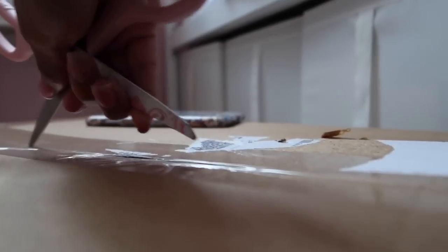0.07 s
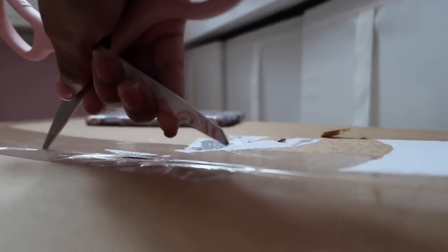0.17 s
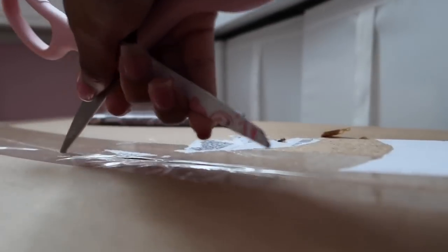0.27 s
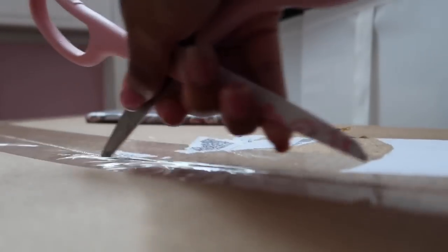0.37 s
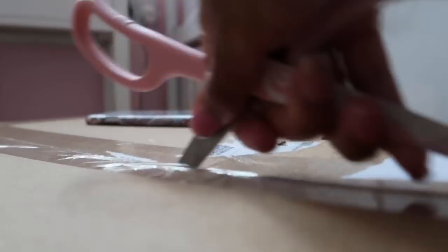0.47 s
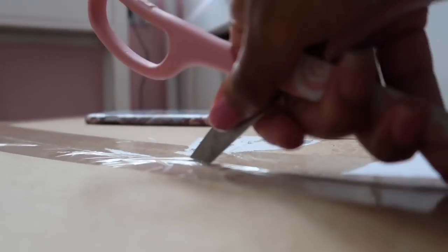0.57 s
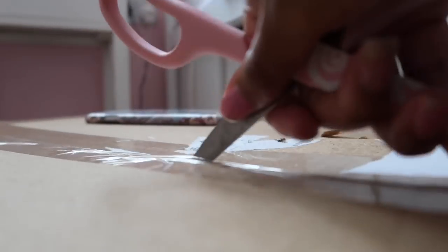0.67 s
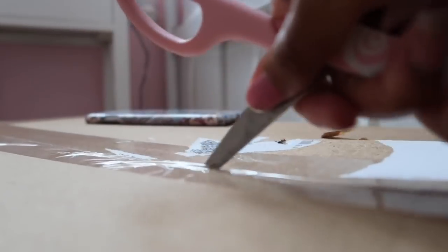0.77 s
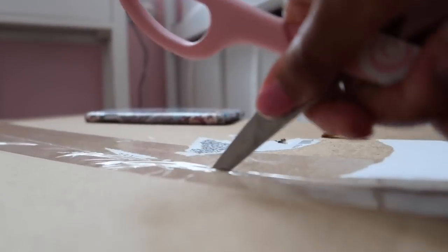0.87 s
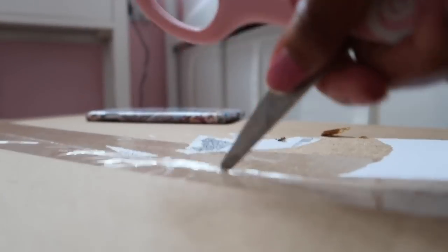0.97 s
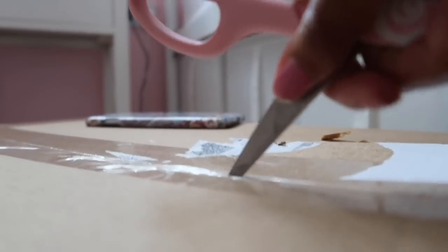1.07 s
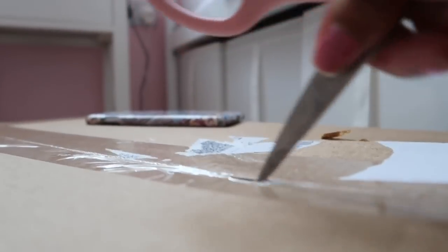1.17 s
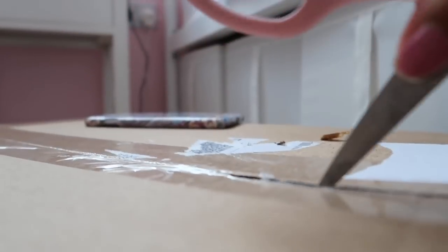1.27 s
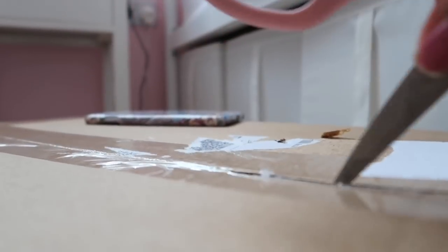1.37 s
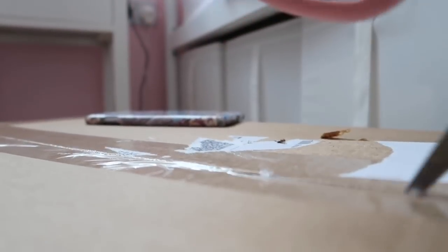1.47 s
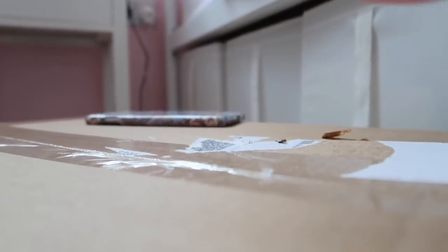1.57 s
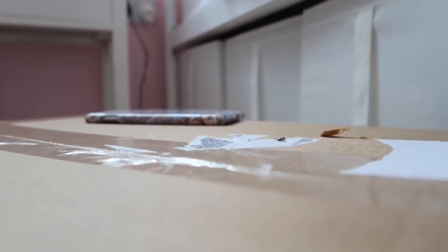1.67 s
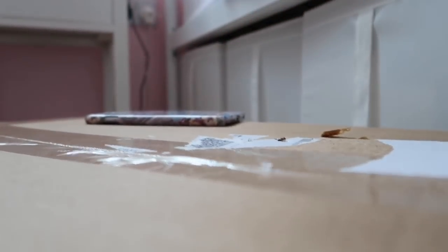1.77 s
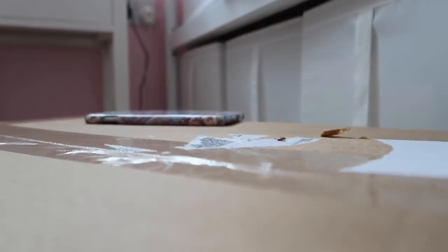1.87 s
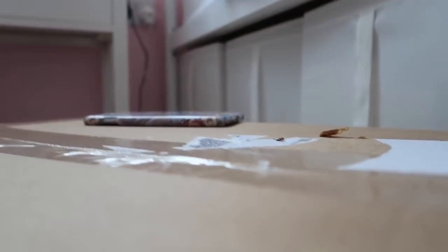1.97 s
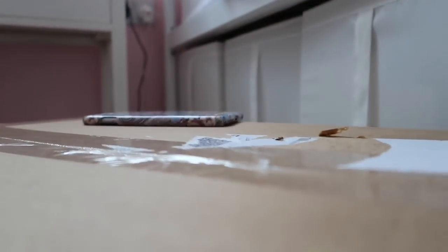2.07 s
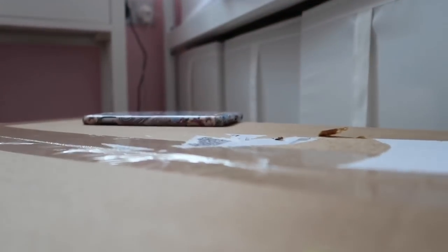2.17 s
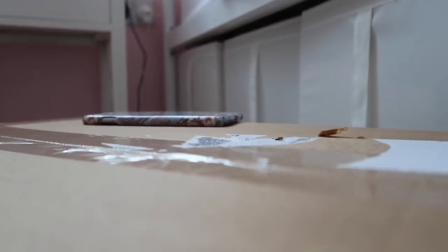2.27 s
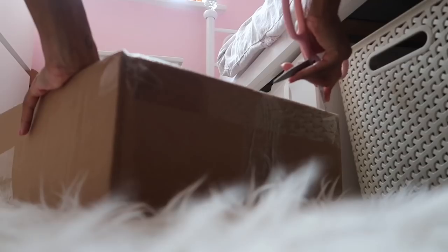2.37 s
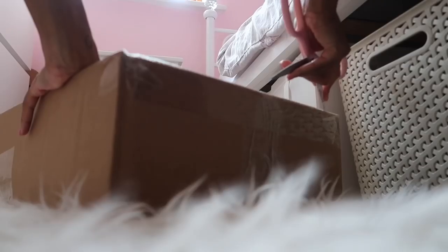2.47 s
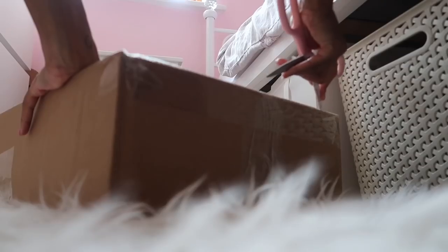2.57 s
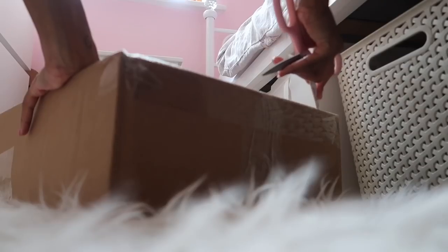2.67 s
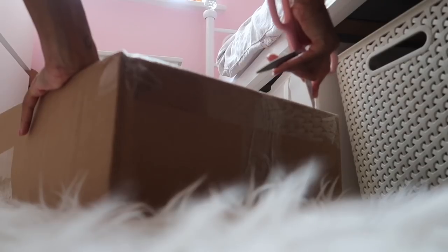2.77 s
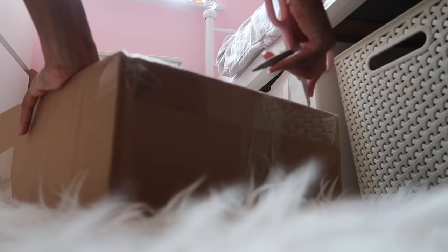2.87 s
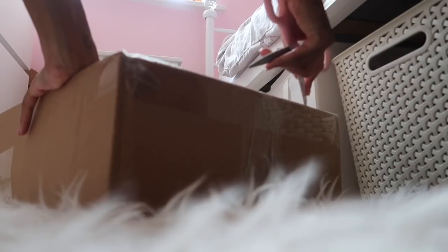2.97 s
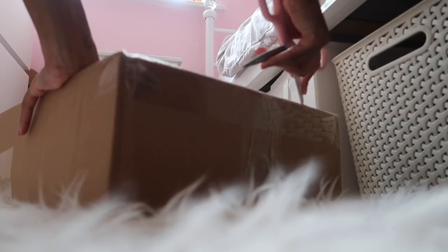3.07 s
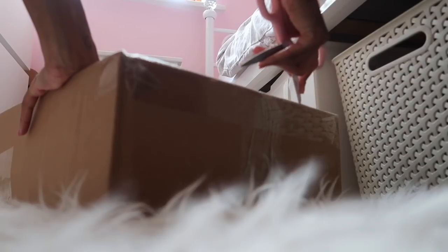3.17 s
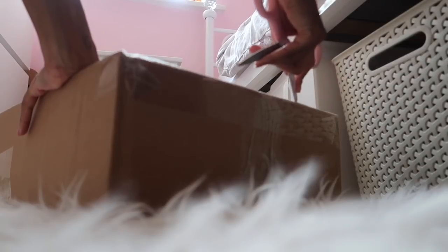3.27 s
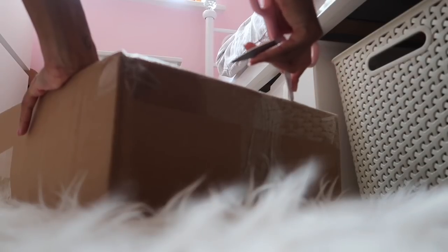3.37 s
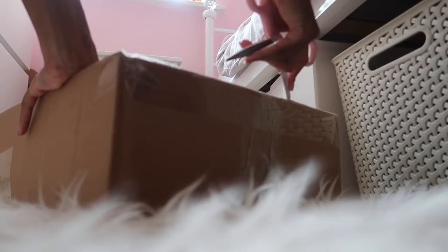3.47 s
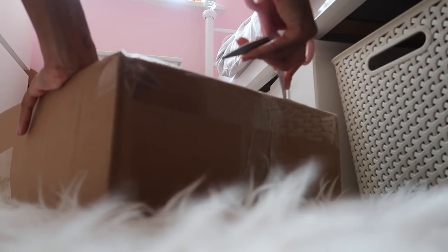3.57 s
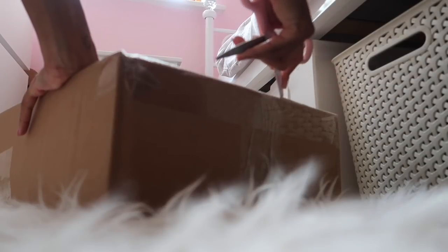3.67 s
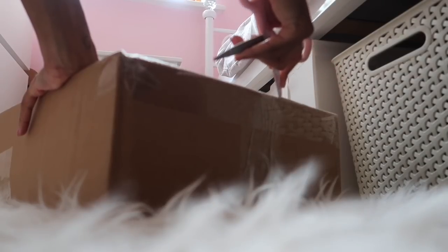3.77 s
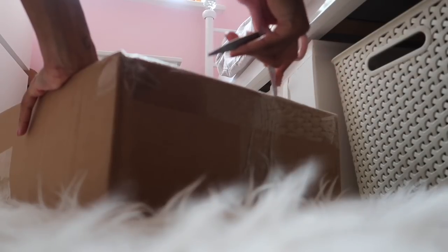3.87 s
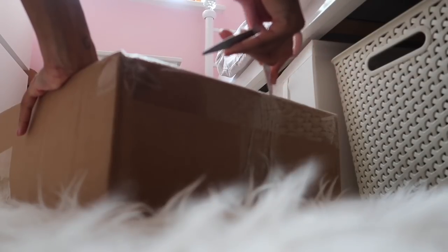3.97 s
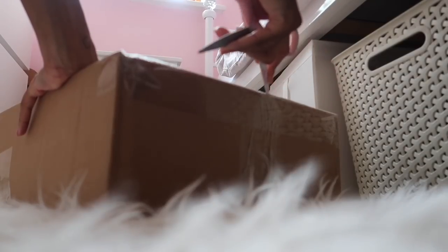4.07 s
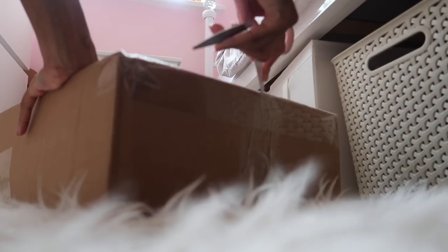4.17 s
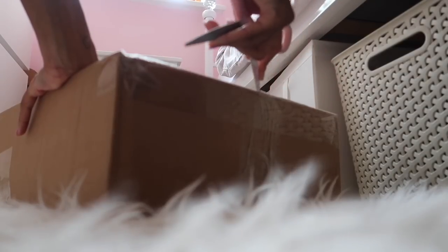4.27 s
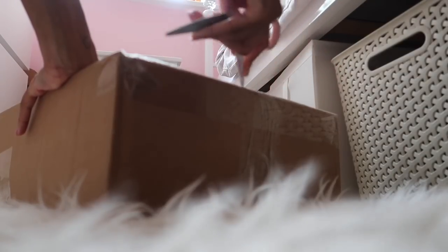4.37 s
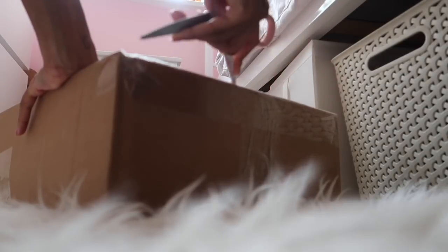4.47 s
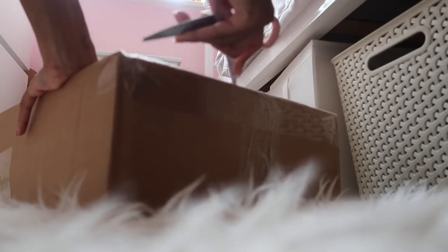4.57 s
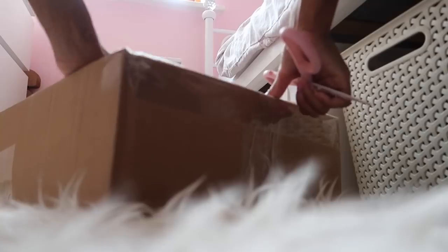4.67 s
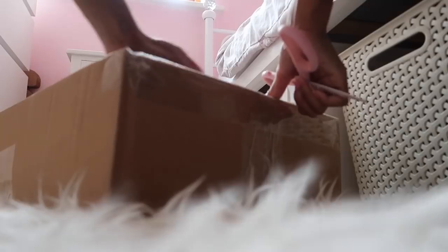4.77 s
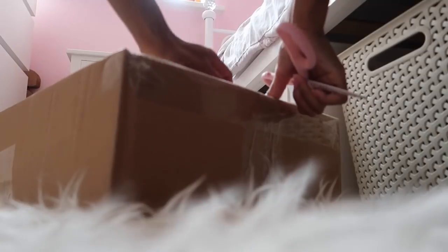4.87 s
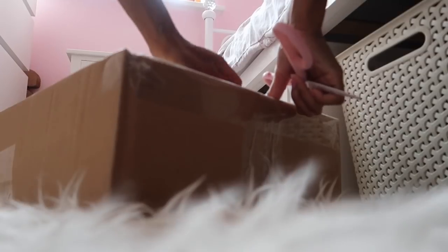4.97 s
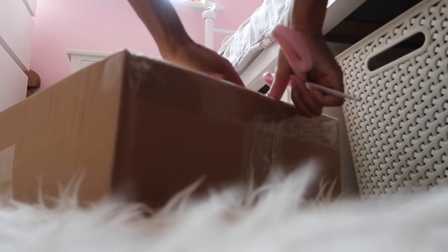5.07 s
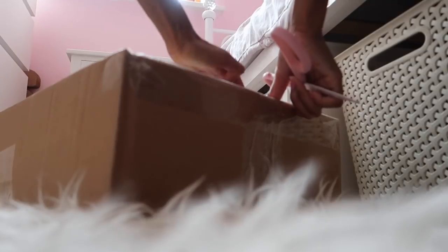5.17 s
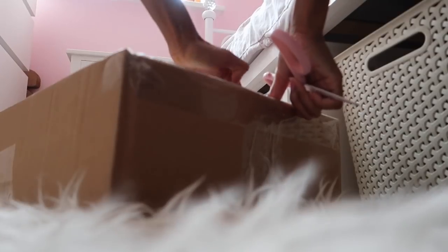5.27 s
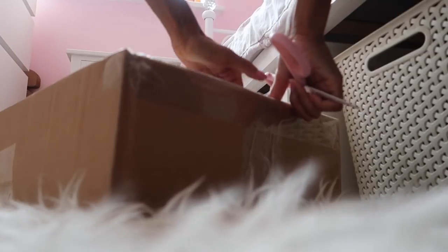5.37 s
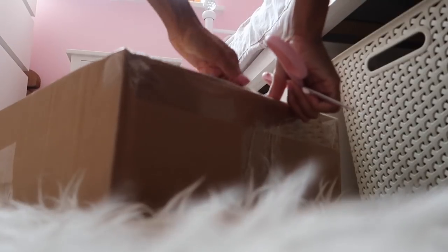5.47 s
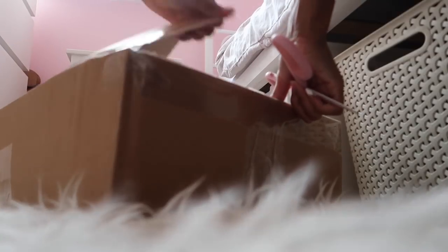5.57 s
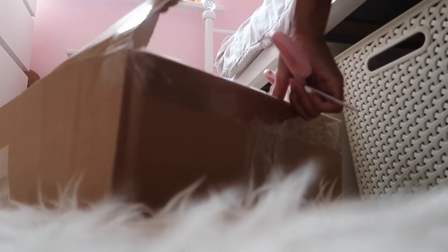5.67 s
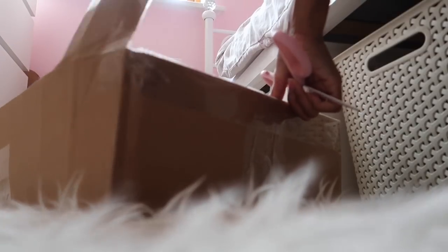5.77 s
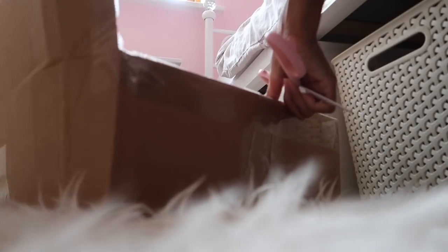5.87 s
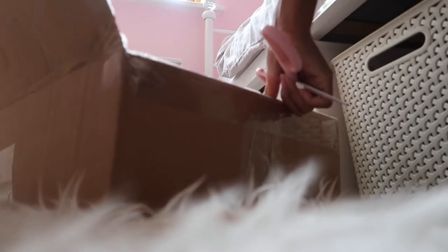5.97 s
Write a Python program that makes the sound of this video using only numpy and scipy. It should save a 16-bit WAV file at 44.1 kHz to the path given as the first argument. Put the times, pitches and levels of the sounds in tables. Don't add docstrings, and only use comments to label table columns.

```python
import sys
import numpy as np
from scipy import signal
from scipy.fft import rfft, irfft, next_fast_len
from scipy.io import wavfile
from scipy.ndimage import uniform_filter1d, map_coordinates

SR = 44100
rng = np.random.default_rng(int(sys.argv[2]) if len(sys.argv) > 2 else 0)


def to_linear_factor(level_db):
    exponent = np.asarray(level_db, float) / 20
    return 10 ** exponent


def pcm_store(signal):
    levels = np.round(np.clip(np.atleast_2d(signal), -1, 1) * 32767)
    wavfile.write(sys.argv[1], SR, levels.astype(np.int16).T)


N = 265085
TIME_S = np.arange(N) / SR
FAR_S = 2.385
HANDS_S = 4.87


def unit(x):
    return x / np.sqrt(np.mean(x ** 2) + 1e-20)


def along(points, f_hz):
    f, v = np.transpose(points)
    return np.interp(np.log(f_hz + 1), np.log(f + 1), v)


def wobble(rate_hz):
    knots = rng.standard_normal(int(N * rate_hz / SR) + 4)
    return map_coordinates(knots, [np.arange(N) * rate_hz / SR])


def filtered(x, response):
    m = next_fast_len(N + SR // 2)
    h = response(np.fft.rfftfreq(m, 1 / SR))
    h = h / np.sqrt(np.mean(np.abs(h) ** 2))
    return irfft(rfft(x, m) * h, m)[..., :N]


def modes(table, top_hz):
    def response(f):
        ring = 0
        for k, (mode_hz, width_hz, db) in enumerate(table):
            damping = 1j * f * width_hz
            ring = ring + (-1) ** k * to_linear_factor(db) * damping / (mode_hz ** 2 - f ** 2 + damping)
        return ring / (1 + 1j * f / top_hz) ** 2
    return response


def colour(points):
    return lambda f: to_linear_factor(along(points, f))


def placed(x, near, far):
    first = TIME_S < FAR_S
    return filtered(x * first, near) + filtered(x * ~first, far)


# f/Hz, density/(dB per Hz)
QUIET = [(25, -12), (52, -3), (90, -25), (205, -2.5), (440, -4.5), (690, -18), (1520, -19.5), (5100, -26),
         (11200, -39.5), (15500, -81)]
# f/Hz, level/dB
CLOSE_HUSH = [(1500, 8.5), (4000, 1.5), (9000, -13)]


def quiet():
    near = lambda f: colour(QUIET)(f) * colour(CLOSE_HUSH)(f)
    noise = placed(rng.standard_normal((2, N)), near, colour(QUIET))
    return to_linear_factor(-53.5 + 0.17 * wobble(2.0)) * noise


def echo(x, decays, lag):
    f_hz, t, z = signal.stft(rng.standard_normal(SR // 2), SR, nperseg=128)
    t60_s = along(decays, f_hz)[:, None]
    tail = signal.istft(z * to_linear_factor(-60 * t / t60_s), SR, nperseg=128)[1]
    return signal.fftconvolve(np.pad(x, (lag, 0)), tail / np.linalg.norm(tail))[:N]


# f/Hz, t60/s
BEDROOM = [(150, 0.15), (1500, 0.053), (10000, 0.11)]


def room(x):
    return echo(x * to_linear_factor(np.where(TIME_S < FAR_S, -19, -11)), BEDROOM, lag=250)


# t/s, peak level/dB
TICKS = [(.165, -23), (0.5254, -32), (1.296, -23.5), (1.455, -42), (1.4746, -32), (1.4975, -29),
         (1.6302, -26.5), (1.673, -44), (1.7553, -24), (1.7816, -24.5), (1.801, -19.5), (1.853, -22.5),
         (1.766, -26), (1.965, -38.5), (1.974, -40), (2.817, -31), (3.047, -43), (4.385, -33), (4.688, -45),
         (2.459, -36.5), (2.809, -26.5), (2.8508, -26.5), (2.866, -26.5), (2.8854, -29), (2.9832, -24.5),
         (3.0108, -24), (3.0855, -28.5), (3.5658, -25.5), (5.162, -23), (5.5792, -16.5)]
# f/Hz, level/dB
FILM = [(2000, -30), (5000, -8), (8000, 0), (12000, -1), (14000, -12), (16000, -20)]


def ticks():
    x, t = np.zeros(N + SR), np.arange(400) / SR
    for (s, db), noise in zip(TICKS, rng.standard_normal((len(TICKS), len(t)))):
        x[round(s * SR):][:len(t)] += to_linear_factor(db - 11 - 60 * t / 0.0084) * noise
    return filtered(x[:N], colour(FILM))


# t/s, level/dB, low f/Hz, high f/Hz, high relative level/dB, t60/s
SNAPS = [(0.3582, -4, 517, 1770, -10, 0.033), (0.382, -4, 328, 656, 3, 0.06),
         (.573, -15, 322, 704, -17, 0.059), (.494, -16.5, 600, 2290, -28, 0.03),
         (.906, -22.5, 1380, 2520, -13, 0.023), (4.897, -25.5, 610, 3080, -21, .03),
         (5.13, -23.5, 526, 2290, -6.5, 0.03), (5.16, -20, 578, 3360, -6, 0.063),
         (5.217, -26.5, 423, 4170, -16, 0.03), (1.296, -15.5, 1019, 1760, -7.5, 0.05),
         (1.9884, -2.5, 1017, 1940, 5, 0.018), (2.168, -40, 1096, 500, 5.5, 0.049),
         (4.494, -19.5, 752, 2360, -6, 0.051), (5.5798, 0.5, 713, 1375, 8.5, 0.032),
         (5.581, -8, 1850, 3200, 3, 0.048), (5.587, -4.5, 702, 2450, -4, 0.033),
         (5.853, -13, 2390, 3870, -4.5, 0.023), (.015, -19, 715, 1300, -9, 0.03),
         (.165, -18, 700, 2600, -13, 0.023), (.198, -18, 830, 2210, -11, 0.037),
         (.289, -14, 643, 2000, -23, 0.035), (.545, -11, 544, 1480, -13, 0.044),
         (.963, -40, 420, 1100, -4, .015), (1.614, -20.5, 460, 2000, -14, 0.02),
         (1.803, -24.5, 545, 2180, -9, .025), (5.797, -19, 637, 4250, -2.5, 0.016),
         (1.989, -14, 2980, 3600, 12, 0.011), (5.854, -2.5, 712, 2350, -11.5, 0.023)]


def snaps():
    x, t = np.zeros(N + SR), np.arange(SR // 4) / SR
    drift = .05 * np.cumsum(rng.standard_normal((len(SNAPS), 2, len(t))), axis=2)
    for (s, db, low_hz, high_hz, high_db, t60_s), (low_rad, high_rad) in zip(SNAPS, drift):
        low = to_linear_factor(-60 * t / t60_s) * np.sin(2 * np.pi * low_hz * t + low_rad)
        high = to_linear_factor(high_db - 60 * t / (0.37 * t60_s)) * np.sin(2 * np.pi * high_hz * t + high_rad)
        attack = 1 - np.exp(-t / .0004)
        x[round(s * SR):][:len(t)] += to_linear_factor(db) * (low + high) * attack
    return x[:N]


# start t/s, length/s, level/dB, f/Hz, width/Hz
GLIDES = [(0.118, 0.096, -52, 5240, 500), (0.752, 0.12, -60, 5250, 500), (0.805, 0.1, -39.5, 1250, 700),
          (1.02, .07, -62, 5150, 500), (1.127, 0.039, -61, 5300, 400), (1.191, 0.11, -57, 5250, 500),
          (1.505, 0.099, -50.5, 5550, 900), (2.083, 0.067, -60.5, 5170, 500),
          (2.281, 0.089, -64.5, 2400, 500), (0.412, 0.22, -35.5, 650, 300), (4.532, 0.16, -59.5, 3800, 400),
          (0.099, 0.076, -26, 207, 50)]


def glides():
    x, t = np.zeros(N + SR), np.arange(SR // 4) / SR
    edge_s = .008
    for (s, length_s, db, f_hz, width_hz), noise in zip(GLIDES, rng.standard_normal((len(GLIDES), len(t)))):
        resonance = np.exp(-np.pi * width_hz * t) * np.sin(2 * np.pi * f_hz * t)
        ring = signal.fftconvolve(noise, resonance)[:len(t)]
        gate = np.clip(np.minimum(t, length_s - t) / edge_s, 0, 1)
        x[round(s * SR):][:len(t)] += to_linear_factor(db) * gate * unit(ring)
    return x[:N] * to_linear_factor(2.0 * wobble(60))


# t/s, level/dB, f/Hz, t60/s
THUMPS = [(.266, -19, 240, .04), (.384, -9.5, 521, 0.037), (.386, -11.5, 920, 0.03), (.02, -19, 194, 0.11),
          (.565, -9, 330, 0.046), (1.2975, -2, 150, 0.056), (1.297, -17, 685, .035),
          (2.037, -13, 115, 0.063), (1.992, -10.5, 160, 0.059), (2.722, -33, 215, .05),
          (2.89, -18.5, 210, 0.054), (3.085, -22.5, 207, 0.038), (3.016, -25.5, 217, .03),
          (4.96, -16, 202, .05), (5.4, -22.5, 220, .04), (5.042, -21, 140, .04),
          (5.165, -10.5, 130.4, 0.051), (5.219, -8, 106.6, .08), (5.383, -2, 210, 0.049),
          (5.467, -18.5, 227, .08), (5.582, -8, 810, 0.046), (5.584, -11.5, 212, 0.066),
          (5.785, -21, 230, .05), (5.8, -15, 194, 0.052), (5.853, 1, 185, 0.04), (5.99, -27, 150, 0.076),
          (2.0312, -4, 500, .012), (1.996, -14.5, 520, 0.051), (2.05, -28, 600, 0.045),
          (5.5, -15, 760, .015), (5.2175, -20.5, 810, 0.017), (5.333, -19.5, 650, 0.014),
          (0.15, -15.5, 750, 0.014), (1.6145, -27, 570, 0.014), (.574, -8.5, 350, 0.023),
          (2.889, -39, 900, .02), (2.72, -37, 1500, 0.036), (1.205, -26, 200, .08),
          (1.086, -12, 200, 0.031), (0.63, -20, 110, 0.059)]


def thumps():
    x, t = np.zeros(N + SR), np.arange(SR // 4) / SR
    rise_cycles = 0.24
    drift = .02 * np.cumsum(rng.standard_normal((len(THUMPS), len(t))), axis=1)
    for (s, db, f_hz, t60_s), drift_rad in zip(THUMPS, drift):
        attack = 1 - np.exp(-t * f_hz / rise_cycles)
        boom = np.sin(2 * np.pi * f_hz * t + drift_rad) * attack
        x[round(s * SR):][:len(t)] += to_linear_factor(db - 60 * t / t60_s) * boom
    return signal.lfilter(*signal.butter(2, 70, "high", fs=SR), x[:N])


# start t/s, length/s, first pressure/dB, last pressure/dB, edge/dB
NEAR_CUTS = [(-.02, 0.4, -37.5, -27, 4), (.41, 0.16, -42, -36.5, -1.5), (.545, 0.052, -26.5, -35.5, 1.5),
             (.6, 0.06, -57, -59, -5), (.7, 0.1, -58, -47, 2), (.82, 0.096, -44.5, -41, -1.5),
             (1.0, 0.11, -52, -38.5, -1), (1.2, 0.12, -42, -30.5, 2.5), (1.43, 0.081, -50.5, -30.5, 0),
             (1.52, 0.086, -30.5, -35, 4), (1.62, .22, -35.5, -32.5, -0.5), (2.0, 0.071, -28, -55.5, -7),
             (2.08, 0.12, -51.5, -62, -11), (2.28, 0.069, -82, -77, 5.5)]
FAR_CUTS = [(2.41, 0.2, -63.5, -56, 11), (2.75, 0.38, -55.5, -59, 5), (3.16, 0.14, -56, -48, 2),
            (3.32, 0.457, -49, -50.5, 8.5), (3.82, 0.079, -55, -70, 15), (3.93, 0.18, -44, -47.5, 1.5),
            (4.07, 0.213, -51, -50.5, 6), (4.35, 0.07, -47, -48.5, 6), (4.46, 0.051, -37.5, -38, -2.5),
            (4.52, 0.12, -59, -64.5, 16.5), (4.73, 0.12, -50, -60, 9.5)]
PULLS = [
    (4.91, 0.15, -40, -47, -8.5),
    (5.14, 0.16, -38.5, -47, 2),
    (5.3, 0.1, -47, -41, 1),
    (5.44, 0.12, -44.5, -41, 3),
    (5.6, 0.12, -33, -52.5, -2.5),
    (5.79, 0.1, -49, -36, -6),
    (5.87, 0.14, -43.5, -57.5, 14),
    (5.98, 0.035, -60, -47, 8),
]


def strokes():
    press_db_per_s, lift_db_per_s = 1088, 458
    t = np.arange(0, N / SR + .01, .002)
    rest_db = np.array([-58, -74, -74])
    power = to_linear_factor(rest_db[:, None] + 0 * t) ** 2
    laws = ((NEAR_CUTS, -39, 0.87, -56, 0.77), (FAR_CUTS, -40, 0.44, -53.5, 1.73), (PULLS, -36.5, 0.35, -59.5, 2.2))
    for table, drum_db, drum_grows, hiss_db, hiss_grows in laws:
        for s, length_s, first_db, last_db, edge_db in table:
            off_db = press_db_per_s * np.maximum(s - t, 0) + lift_db_per_s * np.maximum(t - s - length_s, 0)
            over_db = np.interp(t, [s, s + max(length_s, .01)], [first_db, last_db]) + 45
            levels_db = np.array([drum_db + drum_grows * over_db,
                                  over_db - 45,
                                  hiss_db + edge_db + hiss_grows * over_db])
            power = power + to_linear_factor(levels_db - off_db) ** 2
    return [np.interp(TIME_S, t, np.sqrt(p)) for p in power]


def slips(rate_hz, spread_db, clump_db, clump_hz):
    hit = rng.random(N) < rate_hz / SR
    size = to_linear_factor(spread_db * rng.exponential(size=N)) * rng.standard_normal(N)
    return unit(hit * size * to_linear_factor(clump_db * wobble(clump_hz)))


def drags():
    drum, rasp, hiss = strokes()
    judder = wobble(45)
    drum = drum * unit(to_linear_factor(0.5 * judder) * slips(600, spread_db=-0.5, clump_db=2.5, clump_hz=41))
    rasp = rasp * unit(to_linear_factor(1.06 * judder) * slips(2600, spread_db=1.5, clump_db=2.9, clump_hz=130))
    hiss = hiss * unit(to_linear_factor(2.3 * judder) * slips(12000, spread_db=-0.5, clump_db=0.0, clump_hz=270))
    return np.array([drum, rasp, hiss])


# t/s, strength/dB, weight/dB, edge/dB, fade/s
NEAR_CATCHES = [(0.016, -26, 5, -12, 0.0073), (0.165, -28, 8, -3, 0.01), (.289, -31.5, 0, -16, 0.027),
                (.496, -41, -5, -15, 0.006), (.546, -21, 1, -28, 0.025), (.668, -50, 9, -11, 0.0068),
                (0.965, -36, 4, -39, 0.0044), (1.092, -27.5, 5, -11, 0.006),
                (1.297, -15.5, 1, -3.5, 0.0038), (1.417, -42, 6, -20, 0.0023),
                (1.614, -23.5, -3, -20, 0.0068), (1.803, -22.5, -5.5, -13.5, 0.017),
                (1.99, -10.5, -1, -16.5, 0.0024), (2.032, -18.5, 6, -19.5, 0.0038),
                (2.072, -36.5, 2.5, -24.5, 0.0058), (0.0441, -31, 5, -21, 0.0052),
                (.085, -33.5, 0, -23, 0.0064), (0.109, -39, -1, -18, .006), (.14, -23, -4, -12, 0.0055),
                (.197, -25, -6, -6, 0.007), (.211, -21.5, -0.5, -12, 0.0053), (.241, -26, 4, -10, 0.0045),
                (0.264, -19, -2, -13, 0.0064), (.299, -23, -2, -11, 0.0066), (0.339, -29.5, 5, -12, 0.0028),
                (0.48, -45, 3, -18, .004), (0.513, -39, -3, -19, 0.004), (0.928, -48, 9, 0, 0.0026),
                (1.271, -33.5, 15, -6.5, 0.0081), (1.497, -31, -5, -11.5, 0.012),
                (1.535, -30.5, -1, -4, 0.0044), (1.575, -29.5, 4.5, -14, 0.005),
                (1.673, -28, 0, -10, 0.006), (1.697, -24, 10, -14.5, 0.0033),
                (1.721, -29.5, 1.5, -15, 0.0031), (1.744, -33, 7.5, -13.5, 0.0043),
                (1.779, -27, 0, -12.5, .005), (1.838, -32.5, 1.5, -8, 0.0057)]
FAR_CATCHES = [(2.805, -45.5, 9, -5, 0.048), (2.857, -48, 19, 4, 0.013), (3.922, -46, 11, -5.5, 0.02),
               (4.348, -40.5, 3, -23, 0.048), (4.447, -37.5, -2, -4, 0.013), (4.896, -34.5, 9, -34, 0.0057),
               (4.96, -30.5, 6.5, -17, 0.026), (5.132, -25.5, -2, -14, 0.0044),
               (5.218, -30.5, 3.5, -8.5, 0.03), (5.462, -27, -3, -16, 0.0044), (5.49, -30, 0, -16, 0.0037),
               (5.535, -33, 3.5, -12, 0.0027), (5.699, -45, -11, -12, 0.027), (5.782, -38, 7.5, -27, .005),
               (5.854, -14, -6.5, -9, 0.0086), (2.717, -43, 13.5, -9, 0.0076), (2.828, -47, 6, -7, .005),
               (2.888, -38, -1, -10, 0.0053), (2.932, -37, 1, -9, .006), (3.018, -43, 4.5, -2, 0.00346),
               (4.925, -39, -2, -16.5, 0.0029), (5.029, -37.5, 1, -26, 0.0067), (5.07, -50, 3, -2, 0.0044),
               (5.105, -44.5, 4, -8, 0.0079), (5.159, -30.5, -1, -12, 0.0061), (5.253, -40, 3, -3, .005),
               (5.371, -41, 5, -17, 0.0042), (5.446, -40, 1, -11, 0.0045)]
# peak t/s, strength/dB, weight/dB, edge/dB, fade/s
NEAR_TEARS = [(.032, -29, 3, -19, 0.12), (.143, -32.5, 10, -21, 0.069), (.27, -23.5, 12.5, -9.5, 0.0095),
              (0.33, -21.5, -0.5, -13, 0.022), (0.3605, -16, -4, -15, 0.0049),
              (0.386, -10, -8, -12, 0.0053), (.563, -16, 0, -17.5, 0.0093), (0.574, -20, 1, -26, 0.0075),
              (.908, -27, -29, -12.5, 0.003), (1.205, -30.5, -5, -14, 0.035), (1.353, -32, 2, -12.5, 0.017),
              (1.558, -30, 8, -10, 0.021), (1.649, -28.5, 8, -11.5, 0.012),
              (1.724, -30.5, 6.5, -26.5, 0.019), (1.781, -37, 11.5, -1.5, 0.011),
              (2.045, -35.5, 15, -25.5, 0.021), (2.089, -34, 7, -31, 0.0033),
              (2.172, -56.5, 16, -27, 0.049)]
FAR_TEARS = [(2.595, -53.5, 13, -15, 0.0083), (2.649, -51, 14.5, -6, 0.015),
             (2.727, -40.5, 9.5, -5.5, 0.019), (2.895, -39.5, 11, -5.5, 0.022),
             (2.949, -38.5, 7, -3.5, 0.0095), (3.015, -45.5, 8.5, -3.5, 0.087),
             (3.089, -39.5, 10, -6.5, 0.012), (3.169, -49, 11, -7, 0.058), (3.359, -45.5, 3.5, -11, 0.085),
             (3.49, -39, 1, -8, 0.026), (3.699, -46.5, 3, -17, 0.16), (3.961, -38, -7, -8, 0.042),
             (4.19, -43, 5, -30, 0.049), (4.259, -46.5, 4.5, -9.5, 0.12), (4.397, -43, 3.5, -8, 0.011),
             (4.925, -38, 13.5, -29, 0.0099), (5.043, -39, 18.5, -27, 0.0071),
             (5.166, -26.5, 6, -10, 0.0049), (5.336, -28, -1, -15, 0.0042), (5.388, -32, 7, -14, 0.011),
             (5.451, -43.5, 16.5, -21, 0.024), (5.581, -9.5, -7, -3, 0.0044), (5.799, -25, 11, -21, 0.008)]
# peak t/s, strength/dB, weight/dB, edge/dB, swell/s
RIPS = [
    (.227, -23, 1, -6.5, 0.0072),
    (1.596, -30.5, 8, -13.5, 0.0099),
    (1.702, -22, 1, -16.5, 0.022),
    (3.554, -51, 14, -18, 0.017),
    (4.498, -26, 3, -8.5, 0.023),
    (4.764, -49, 9, 3.5, 0.0083),
]


def blows():
    timing = [(row, .0007, row[-1]) for row in NEAR_CATCHES + FAR_CATCHES]
    timing += [(row, 0.53 * row[-1], row[-1]) for row in NEAR_TEARS + FAR_TEARS]
    timing += [(row, row[-1], 0.003) for row in RIPS]
    return [(s, db + weight_db, db, db + edge_db, swell_s, fade_s)
            for (s, db, weight_db, edge_db, _), swell_s, fade_s in timing]


def grains(count, length):
    knots = rng.standard_normal((count, 300))
    where = np.meshgrid(np.arange(count), np.linspace(0, 299, length), indexing="ij")
    return to_linear_factor(1.79 * map_coordinates(knots, where, order=1))


def forces():
    force = np.pad(drags(), ((0, 0), (SR, SR)))
    hits = blows()
    lead = SR // 10
    t = np.arange(-lead, SR // 5) / SR
    chance = rng.standard_normal((len(hits), 3, len(t)))
    chance[:, 0] -= uniform_filter1d(chance[:, 0], size=700, axis=1)
    chance[:, 1:] *= grains(len(hits), len(t))[:, None]
    steep_db, knock = np.array([[11], [9], [9.5]]), np.array([[20], [14], [1.5]])
    knock_swell_s = np.array([[.004], [.002], [.0014]])
    for (s, *dbs, swell_s, fade_s), noise in zip(hits, chance):
        slope = np.where(t < 0, -t / max(swell_s, .0004), t / max(fade_s, .001))
        shape = to_linear_factor(-steep_db * slope ** 0.81)
        noise = noise + (t == 0) * knock * np.exp(-swell_s / knock_swell_s)
        noise[0] -= uniform_filter1d(noise[0], size=300)
        level = to_linear_factor(np.array(dbs) + [2.5, -1.5, -.7])[:, None]
        force[:, SR + round(s * SR) - lead:][:, :len(t)] += level * shape * noise
    fingers = force[2, SR + round(HANDS_S * SR):]
    fingers[:] = 1.84 * uniform_filter1d(fingers, size=3)
    return force[:, SR:SR + N]


def patchy(x, depth_db):
    z = signal.stft(x, nperseg=256)[2]
    field = uniform_filter1d(rng.standard_normal(z.shape), size=2, axis=0)
    field = uniform_filter1d(field, size=16, axis=1)
    return signal.istft(z * to_linear_factor(depth_db * unit(field)), nperseg=256)[1][:N]


# f/Hz, width/Hz, level/dB
NEAR_BOX = [(63, 85, -2.5), (108.4, 63, 2.5), (200.6, 119, -3.5), (338, 143, -5.5)]
# f/Hz, width/Hz, level/dB
FAR_BOX = [(49.6, 16.4, -2.5), (93.3, 32.4, -3.5), (129, 27.3, -1.5), (216.7, 69, -2.5), (244, 600, -24.5)]
# f/Hz, width/Hz, level/dB
NEAR_BOARD = [(500, 137, 2.5), (733, 206, 1.5), (890, 300, -1.5), (1480, 470, -7.5), (1713, 170, -5),
              (2340, 770, -14.5)]
# f/Hz, width/Hz, level/dB
FAR_BOARD = [(412, 98, 7), (699, 53, 5), (838, 140, 3), (1560, 280, -2), (1860, 250, -3.5), (2360, 400, -5),
             (3220, 670, -10)]
# f/Hz, density/(dB per Hz)
NEAR_TAPE = [(1470, -8.5), (2500, 2.5), (3700, -5), (5180, -11), (6520, -11.5), (8340, -6), (9720, -12),
             (12600, -12), (14400, -45)]
# f/Hz, density/(dB per Hz)
FAR_TAPE = [(1470, -5), (2500, -0.5), (3250, -3), (3990, -3), (4310, -4.5), (5720, -6), (10300, -13),
            (12400, -10), (15600, -38)]
# f/Hz, width/Hz, level/dB
BLADE = [(5260, 1000, -2.5), (7450, 440, -11)]


def box(force):
    drum, rasp, hiss = force
    panels = placed(drum, modes(NEAR_BOX, top_hz=900), modes(FAR_BOX, top_hz=900))
    board = placed(rasp, modes(NEAR_BOARD, top_hz=4320), modes(FAR_BOARD, top_hz=4430))
    near_tape = lambda f: colour(NEAR_TAPE)(f) + np.abs(modes(BLADE, top_hz=15000)(f))
    tape = placed(hiss, near_tape, colour(FAR_TAPE))
    return panels + patchy(board + tape, depth_db=3.0)


# f/Hz, side minus mid level/dB
WIDTH = [(60, -85), (125, -62), (250, -23), (500, -20.5), (1000, -19), (2000, -14), (4000, -4.5),
         (8000, 0.5), (13000, 6.5)]


def spread(force, film):
    other = box(force * rng.choice([-1, 1], force.shape))
    other = other + echo(film, [(200, 0.013), (8000, 0.0028)], lag=0)
    width = colour(WIDTH)(np.fft.rfftfreq(N, 1 / SR))
    return irfft(rfft(other + to_linear_factor(5) * room(other)) * width, N)


# t/s, left minus right level/dB
PAN = [(0, 1), (.6, 0), (1.2, -.6), (2.35, -.6), (2.9, 0), (6.1, .25)]


def panned(mid):
    left_db = np.interp(TIME_S, *np.transpose(PAN))
    return mid * np.tanh(left_db * np.log(10) / 40)


# t/s, delay/us
LAG = [(0, -20), (.75, 0), (1.25, 20), (1.75, 45), (2.1, 65), (2.38, 65), (2.39, 0)]


def lagged(mid):
    lag_us = np.interp(TIME_S, *np.transpose(LAG))
    return -lag_us * 1e-6 * SR / 2 * np.gradient(uniform_filter1d(mid, size=6))


def scene():
    force = forces()
    film = ticks() + snaps() + glides()
    direct = box(force) + film
    hush = quiet()
    mid = direct + room(direct) + hush[0]
    side = spread(force, film) + hush[1]
    side = side + panned(mid)
    boom = thumps()
    mid = mid + boom + room(boom)
    side = side + lagged(mid)
    dip = 1 - .75 * np.exp(-((TIME_S - FAR_S) / 0.017) ** 4)
    return dip * np.array([mid + side, mid - side])


def roll_off(x):
    return signal.sosfilt(signal.butter(12, 15790, fs=SR, output="sos"), x)


def record(dry):
    heard = signal.lfilter(*signal.butter(2, 30.5, "high", fs=SR), dry)
    return roll_off(np.clip(heard, -1, 1))


dry = scene()
out = record(dry)
pcm_store(out)
```